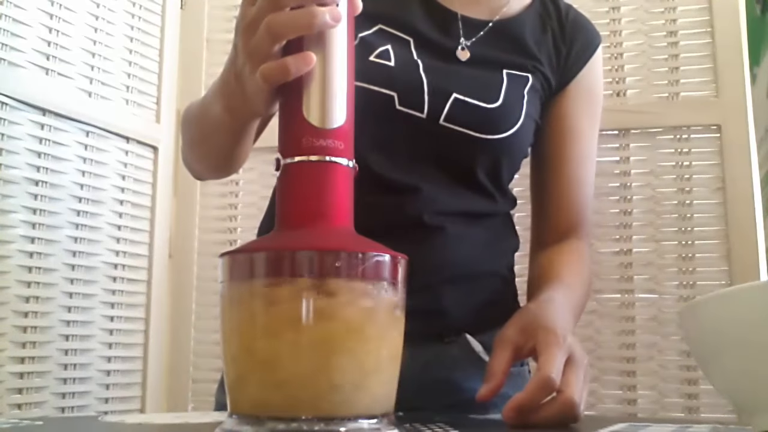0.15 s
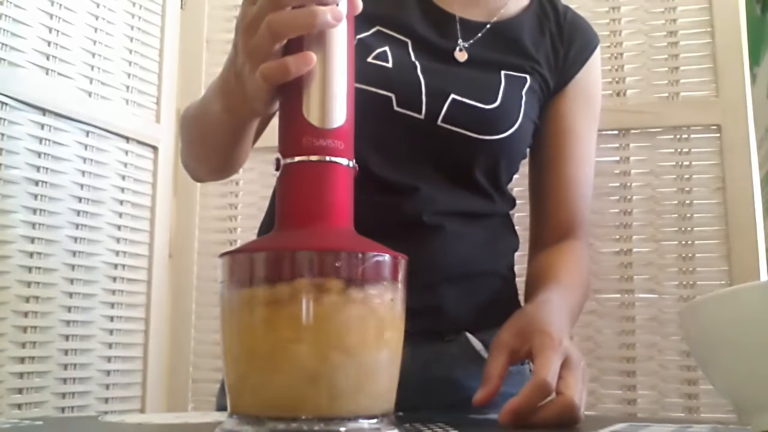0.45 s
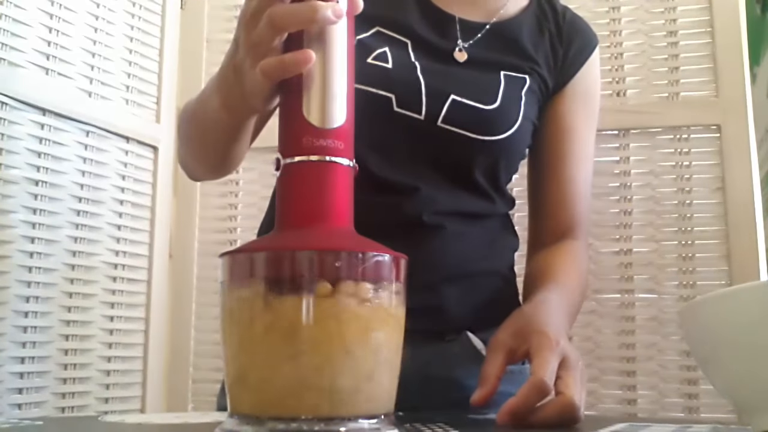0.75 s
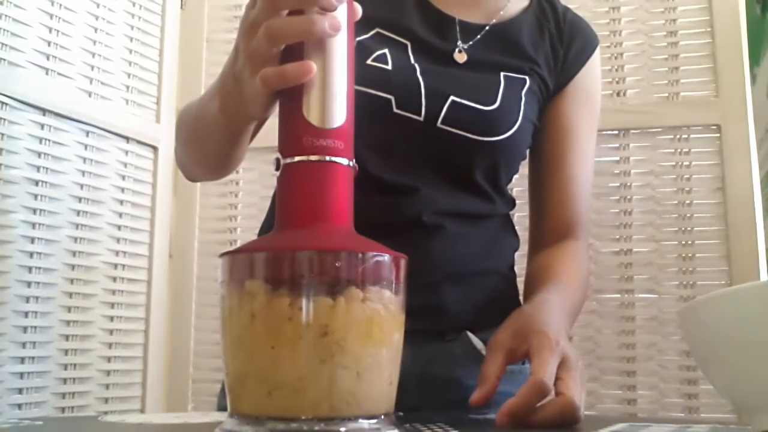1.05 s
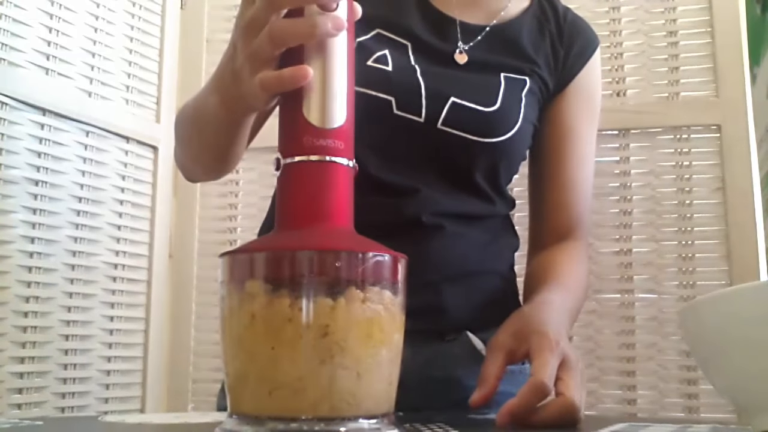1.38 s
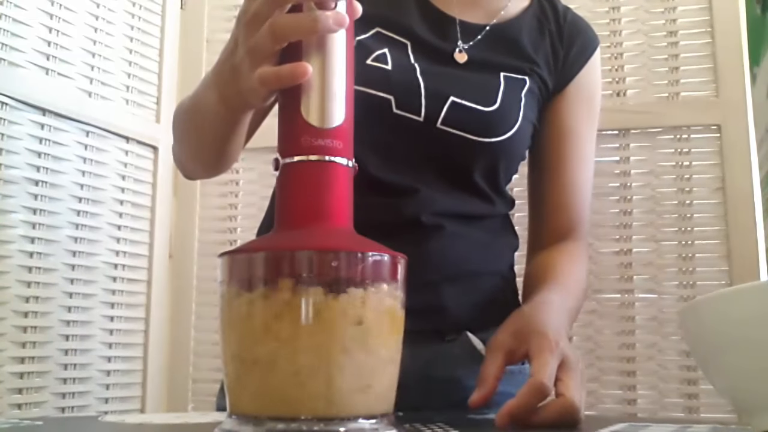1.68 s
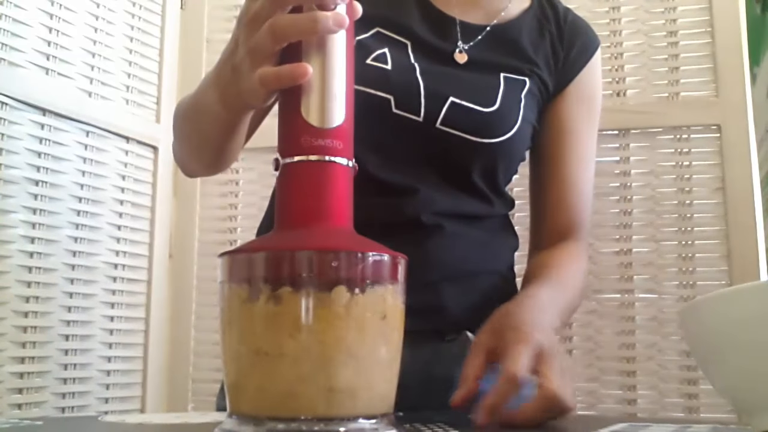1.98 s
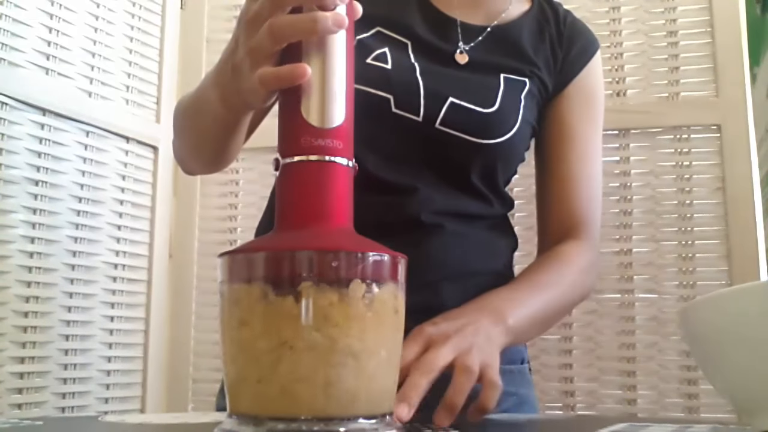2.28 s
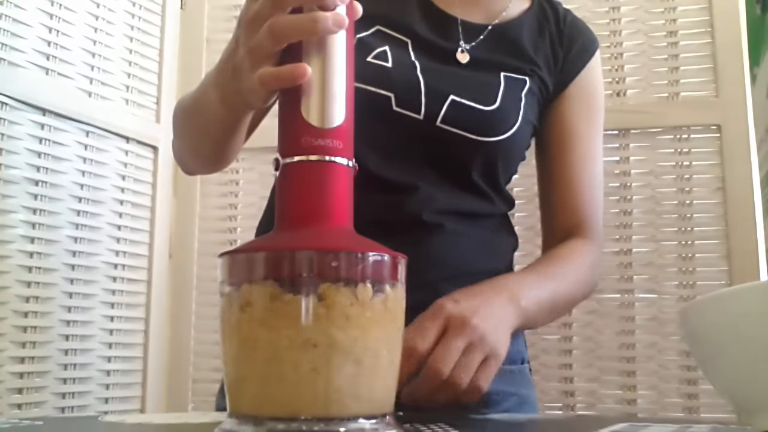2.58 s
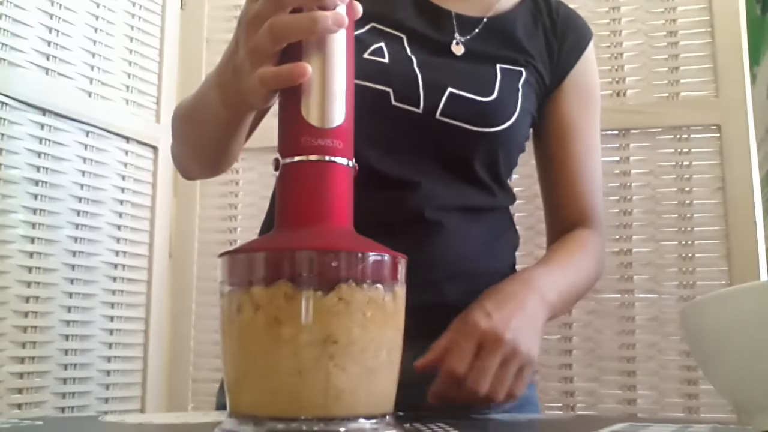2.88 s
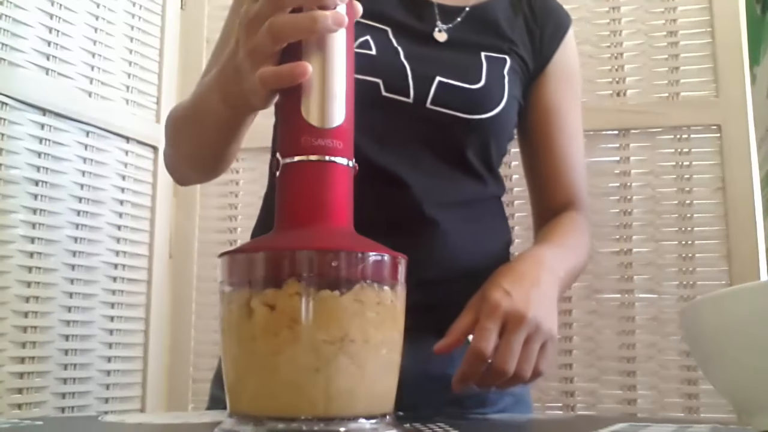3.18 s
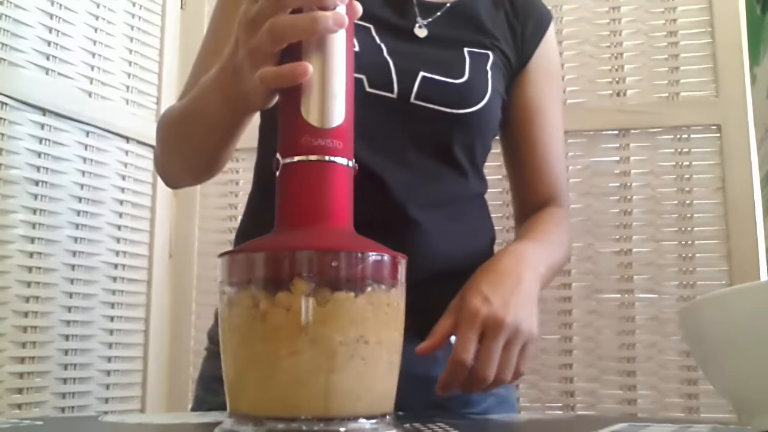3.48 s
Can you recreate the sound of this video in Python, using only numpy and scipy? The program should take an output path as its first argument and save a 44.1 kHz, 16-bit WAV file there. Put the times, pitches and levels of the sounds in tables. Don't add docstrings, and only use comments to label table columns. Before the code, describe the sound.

Hand blender chopper whirring harshly, coasting to a short pause, then restarting with a thump and grinding on

```python
import sys
import numpy as np
from scipy import signal
from scipy.fft import rfft, irfft
from scipy.io import wavfile

SR = 44100
rng = np.random.default_rng(int(sys.argv[2]) if len(sys.argv) > 2 else 0)


def wav_out(sig):
    wavfile.write(sys.argv[1], SR, np.round(np.clip(np.atleast_2d(sig).T, -1, 1) * 32767).astype(np.int16))


def ratio_of_db(decibels):
    return 10 ** (np.asarray(decibels, float) / 20)


N = 160965
OFF_S, ON_S = 0.91, 1.503
MAINS_THROB_HZ = 100
TONE_THROB = 0.05


def read(points, hz):
    f, value = np.transpose(points)
    return np.interp(np.log(hz + 1), np.log(f + 1), value)


def evened(x):
    return x / np.sqrt(np.mean(x ** 2) + 1e-20)


def slow(hz):
    t = np.arange(0, N + 128, 64) / SR
    drift = 0
    for f in np.geomspace(hz / 20, hz, num=24):
        drift = drift + np.sin(2 * np.pi * (f * t + rng.random())) / np.sqrt(f)
    return np.interp(np.arange(N) / SR, t, evened(drift))


def colour(x, gain):
    return irfft(rfft(x) * gain(np.fft.rfftfreq(N, 1 / SR)), N)


# (frequency [Hz], likeness [0 to 1])
LIKENESS = [(60, 0.37), (130, 0.63), (290, 0.9), (640, 0.88), (1410, 0.61), (3100, 0.61), (6820, 0.074),
            (15000, 0.25)]
# (frequency [Hz], left minus right [dB])
LEAN_LEFT = [(60, -2), (130, -6.5), (290, -1.5), (640, -4), (1410, -3.5), (3100, -5), (6820, -9.5),
             (15000, 0.5)]


def pair(a, b):
    def same(hz):
        return np.clip(read(LIKENESS, hz), 0, 1)

    mixed = colour(a, same) + colour(b, lambda hz: np.sqrt(1 - same(hz) ** 2))
    left = colour(mixed, lambda hz: ratio_of_db(read(LEAN_LEFT, hz) / 2))
    right = colour(a, lambda hz: ratio_of_db(-read(LEAN_LEFT, hz) / 2))
    return np.array([left, right])


# (time [s], speed [turns per s])
BLADE_SPEED = [(0, 36.6), (.3, 36.85), (.9, 37.15), (1.7, 37.2), (2.2, 37.6), (2.7, 38.05), (3.2, 38.35),
               (3.65, 38.55)]


def motor():
    t = np.arange(N) / SR
    off, on = np.maximum(t - OFF_S, 0), np.maximum(t - ON_S, 0)
    share = np.where(t < ON_S, np.exp(-off / 0.5), 1 - (1 - 0.76) * np.exp(-on / 0.04))
    turns_per_s = share * np.interp(t, *np.transpose(BLADE_SPEED)) * (1 + 0.0013 * slow(hz=12))

    creep_db, creep_db_per_s = -23, 651
    first_run_db, coast_db_per_s, coast_knee_s = 1.12, 177, 0.073
    coast_db = first_run_db - coast_db_per_s * off ** 2 / (off + coast_knee_s)
    stop_db = np.maximum(coast_db, creep_db - creep_db_per_s * (ON_S - t))
    surge_db = 3 * np.exp(-(on / 0.07) ** 2)
    start_db = 20 * np.log10(1 - np.exp(-on / 0.016) + ratio_of_db(creep_db)) + surge_db
    return t, np.cumsum(turns_per_s) / SR, np.where(t < ON_S, stop_db, start_db)


def powered(t):
    return (t < OFF_S) | (t > ON_S)


def throb(t, depth):
    return 1 + depth * np.cos(2 * np.pi * MAINS_THROB_HZ * t) * powered(t)


# (frequency [Hz], level [dB per Hz])
GRIND_COLOUR = [(18, -70), (30, -19), (194, -15), (449, -5.5), (866, -4.5), (2750, -9.5), (3140, -10.5),
                (3980, -16.5), (16000, -33.5)]
# (frequency [Hz], width [Hz], first run boost [dB], second run boost [dB])
BOWL_RINGS = [(330, 138, 7, 6.5), (468.5, 109, 11.5, 10.5), (763, 187, 5, 5.5), (863, 82, -7.5, -7.5),
              (988, 160, 2, 4), (1296, 230, 3.5, 4.5), (1558, 510, 4.5, 6.5), (1900, 270, 10.5, 5),
              (2510, 450, 3.5, 5.5), (3624, 150, 8.5, 8.5), (4013, 630, 6, 12.5), (7040, 1200, 3.5, 5),
              (8150, 930, 7, 9), (11120, 1160, 6.5, 9)]


def grind(t, turns, loss_db):
    repeat_share, pattern_life_s, pattern_steps = 0.38, 0.14, 1100
    chunks_per_s, chunk_spread_db, chunk_db = 1500, 4, -5.5
    level = ratio_of_db(0.4 * slow(hz=29.68)) * (1 + 0.1 * np.cos(4 * np.pi * turns))
    first = t < ON_S
    bass_gain = ratio_of_db(loss_db * np.where(first, 0.75, 1))
    treble_gain = ratio_of_db(loss_db * np.where(first, 1.2, 1))
    out = []
    for _ in range(2):
        patterns = rng.standard_normal((40, pattern_steps))
        angle_step = (turns % 1 * pattern_steps).astype(int)
        age = t / pattern_life_s
        k, mix = age.astype(int), age % 1 * np.pi / 2
        locked = np.cos(mix) * patterns[k, angle_step] + np.sin(mix) * patterns[k + 1, angle_step]

        hits = (rng.random(N) < chunks_per_s / SR) * rng.standard_normal(N)
        chunks = evened(hits * ratio_of_db(chunk_spread_db * np.minimum(rng.exponential(1, N), 4)))
        drive = np.sqrt(repeat_share) * locked
        drive += np.sqrt(1 - repeat_share) * rng.standard_normal(N)
        drive += ratio_of_db(chunk_db) * chunks

        runs = []
        for run in range(2):
            def body(hz):
                db = read(GRIND_COLOUR, hz)
                for row in BOWL_RINGS:
                    db = db + row[2 + run] / (1 + (2 * (hz - row[0]) / row[1]) ** 2) ** 2
                return ratio_of_db(db)

            runs.append(evened(colour(drive * level, body)))
        x = np.where(t < ON_S - 0.1, *runs)
        low = colour(x, lambda hz: 1 / (1 + (hz / 1200) ** 2))
        out.append(low * bass_gain + (x - low) * throb(t, 0.09) * treble_gain)
    return ratio_of_db(-16) * np.array(out)


TONE_ORDERS = [2, 12, 34, 37, 69, 72, 75, 102, 105, 108]
# (first run level [dB], second run level [dB])
TONE_LEVELS = [(-49, -47), (-42, -42), (-36, -38), (-38, -37), (-46, -40), (-35, -33), (-41, -39),
               (-44, -43), (-37, -40), (-42, -45)]


def whine(t, turns, loss_db):
    out = np.zeros((2, N))
    for order, (first_db, second_db) in zip(TONE_ORDERS, TONE_LEVELS):
        db = np.where(t < ON_S, first_db, second_db) + 3 * slow(hz=35.03)
        cycles = order * turns + rng.random() + np.array([[0], [0.25]])
        out += np.sqrt(2) * ratio_of_db(db) * np.cos(2 * np.pi * cycles)
    return out * ratio_of_db(loss_db * np.where(t < ON_S, 2, 1)) * throb(t, TONE_THROB)


GEAR_ORDERS = [40, 73, 106, 134]
GEAR_SURGE_DB = [7, 5, 13, 15]
# (width [Hz], first run level [dB], second run level [dB])
GEAR_BANDS = [(200, -30.5, -29), (300, -34, -32), (306, -32.5, -33.5), (200, -49, -49.5)]


def mesh(t, turns, loss_db):
    out = np.zeros((2, N))
    surge = np.exp(-((t - ON_S) / 0.061) ** 2) * (t > ON_S)
    for order, surge_db, (width_hz, first_db, second_db) in zip(GEAR_ORDERS, GEAR_SURGE_DB, GEAR_BANDS):
        r = np.exp(-np.pi * width_hz / SR)
        noise = rng.standard_normal((2, N)) + 1j * rng.standard_normal((2, N))
        fuzz = signal.lfilter([1], np.convolve([1, -r], [1, -r]), noise)
        band = evened((fuzz * np.exp(2j * np.pi * order * turns)).real)
        out += ratio_of_db(np.where(t < ON_S, first_db, second_db + surge_db * surge)) * band
    return out * ratio_of_db(loss_db * np.where(t < ON_S, 2, 1)) * throb(t, TONE_THROB)


# (frequency [Hz], width [Hz], boost [dB])
SHELL_RINGS = [(2770, 300, 8), (4010, 380, 7)]


def housing(x):
    def lift(hz):
        return ratio_of_db(sum(db / (1 + (2 * (hz - f) / width) ** 2) for f, width, db in SHELL_RINGS))

    return colour(x, lift)


# (frequency [Hz], time to fall 60 dB [s])
ECHO_TIME = [(250, .55), (700, 0.61), (2000, .45), (6000, 0.38)]


def kitchen(x):
    taps = np.zeros((2, SR // 2))
    at = np.arange(200, SR // 2 - 20, 20) + rng.integers(0, 20, (2, (SR // 2 - 201) // 20))
    np.put_along_axis(taps, at, rng.choice([-1., 1.], at.shape), 1)
    hz, t, z = signal.stft(taps, SR, nperseg=256)
    fade = ratio_of_db(-60 * t / read(ECHO_TIME, hz)[:, None])
    tail = signal.istft(z * fade, SR, nperseg=256)[1]
    return signal.fftconvolve(x, tail / np.linalg.norm(tail[0]), axes=1)[:, :N]


# (frequency [Hz], level [dB per Hz])
ROOM_COLOUR = [(18, -41), (30, -33), (221, 4.5), (600, -8.5), (1320, -18), (1810, -12), (2830, -25.5),
               (13700, -32), (16000, -32.5)]
# (frequency [Hz], level [dB])
WHISTLES = [(250, -62.5), (594, -57.5), (1800, -67.5)]


def floor(t):
    def air():
        noise = rng.standard_normal(N)
        return evened(colour(noise, lambda hz: ratio_of_db(read(ROOM_COLOUR, hz)) * (hz < 14500)))

    a, b = air(), air()
    gain = ratio_of_db(-50 + 2.5 * slow(hz=40.5))
    hum = 0
    for hz, db in WHISTLES:
        level = ratio_of_db(db + 6.6 * slow(hz=39.7))
        hum = hum + level * np.sin(2 * np.pi * hz * t + 2 * slow(hz=32.4))
    return pair(gain * a + hum, gain * b + hum)


def squeak(t):
    start_s, length_s, pitch_hz, level_db = 1.17, 0.03, 2430, -53
    shape = np.exp(-((t - start_s) / length_s) ** 2)
    level = ratio_of_db(level_db + 2.2 * slow(hz=60.5))
    return level * shape * np.sin(2 * np.pi * pitch_hz * t + slow(hz=40.8))


# (frequency [Hz], level [dB], time to fall 60 dB [s])
HANDLE_RINGS = [
    (237, -4.5, 0.21),
    (290, -6, 0.18),
    (685, -24, .1),
]


def jolt(t):
    s = np.maximum(t - 1.462, 0)
    ring = sum(ratio_of_db(db - 60 * s / t60) * np.sin(2 * np.pi * hz * s) for hz, db, t60 in HANDLE_RINGS)
    return ratio_of_db(-20) * np.sqrt(2) * np.minimum(s / 0.011, 1) * ring


SHAFT_ROCK = .003, .0007


def scene():
    t, turns, loss_db = motor()
    rock = np.where(t < ON_S, *SHAFT_ROCK) * np.sin(2 * np.pi * MAINS_THROB_HZ * t)
    rocked = turns + rock * powered(t)
    tones = housing(whine(t, rocked, loss_db) + mesh(t, turns, loss_db))
    blender = pair(*(grind(t, turns, loss_db) + tones + squeak(t) + jolt(t)))
    return blender + ratio_of_db(-14) * kitchen(blender) + floor(t)


def band_limit(x):
    return signal.sosfilt(signal.butter(12, 15680, fs=SR, output="sos"), x)


def record(dry):
    knee = 1.02
    edge = signal.firwin(1023, 15680, window=("kaiser", 9), fs=SR)[None]
    mix = signal.oaconvolve(knee * np.tanh(dry / knee), edge, "same")
    return band_limit(mix)


dry = scene()
out = record(dry)
wav_out(out)
```